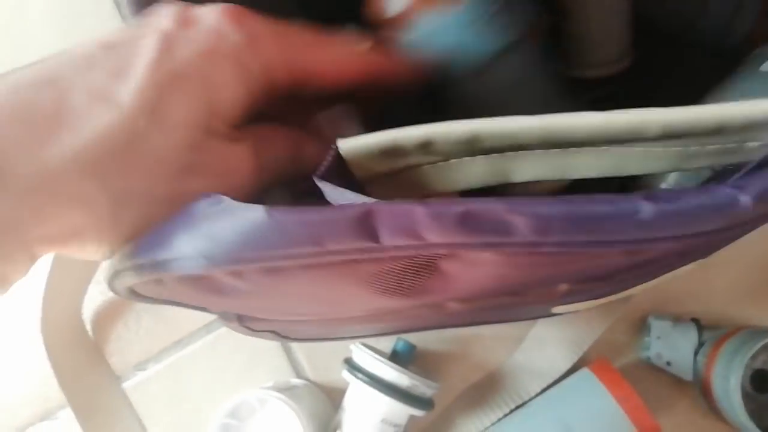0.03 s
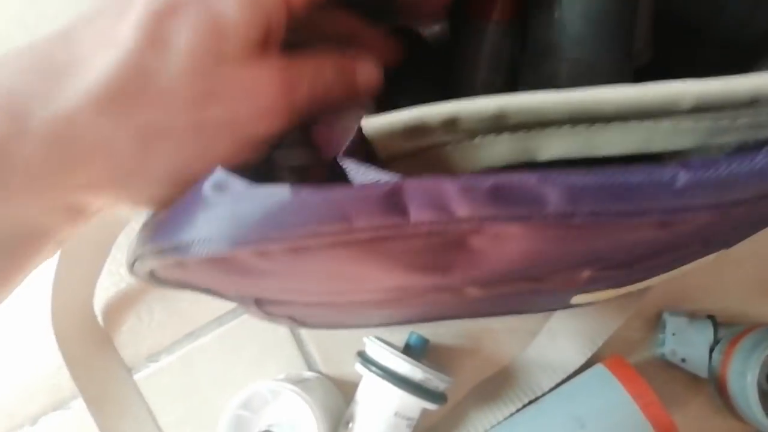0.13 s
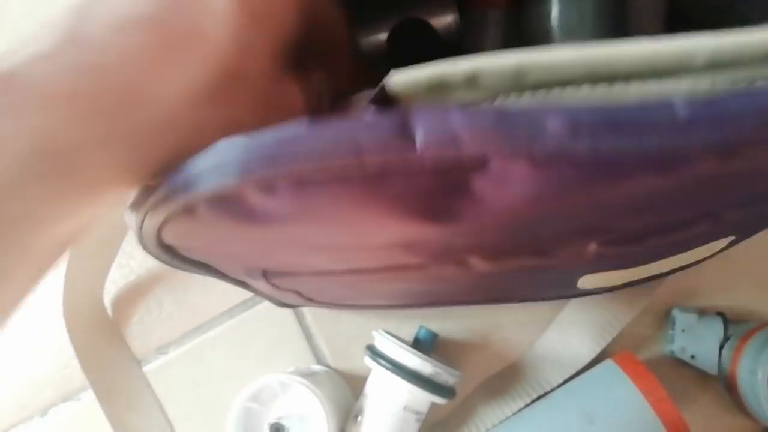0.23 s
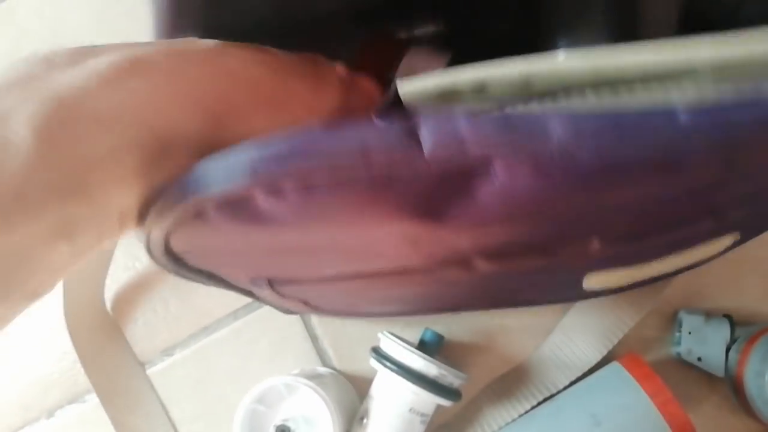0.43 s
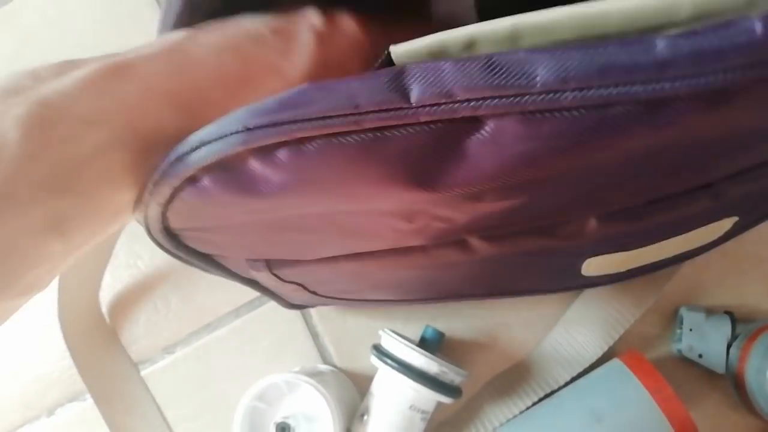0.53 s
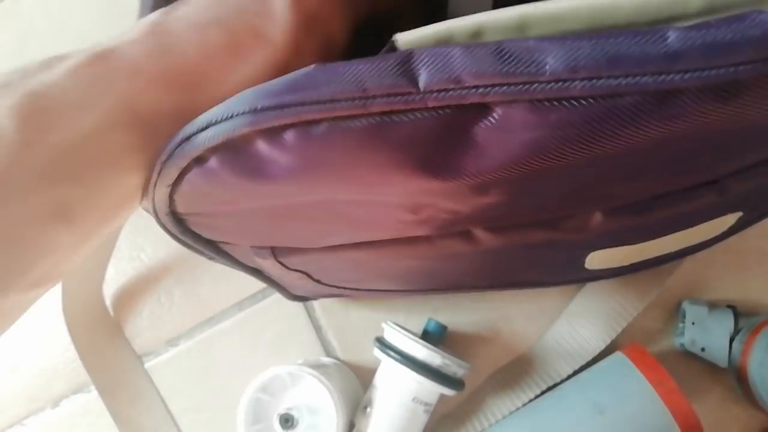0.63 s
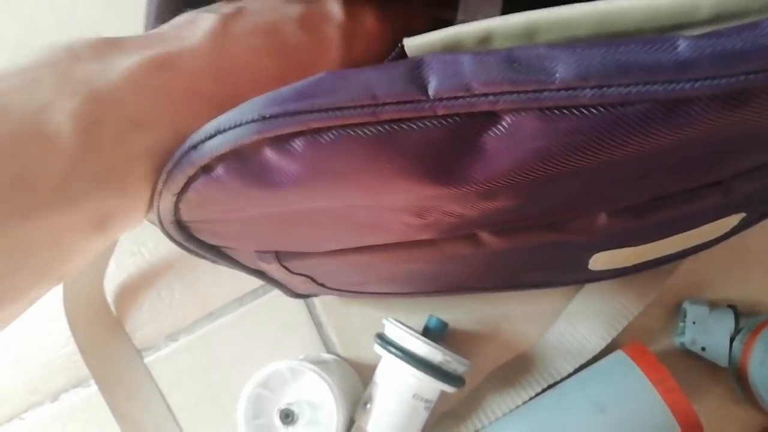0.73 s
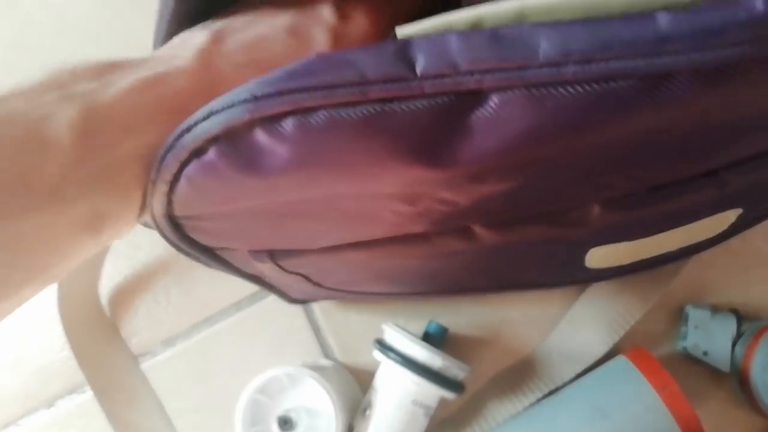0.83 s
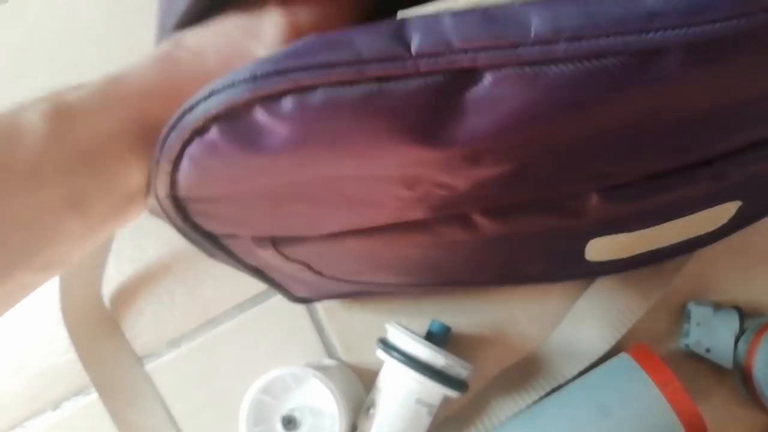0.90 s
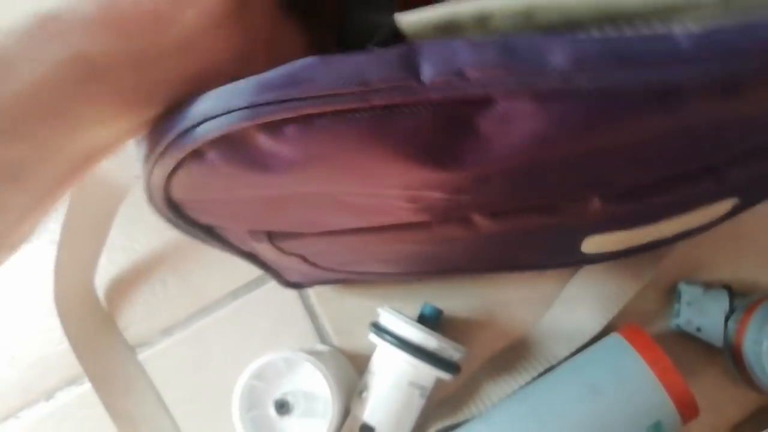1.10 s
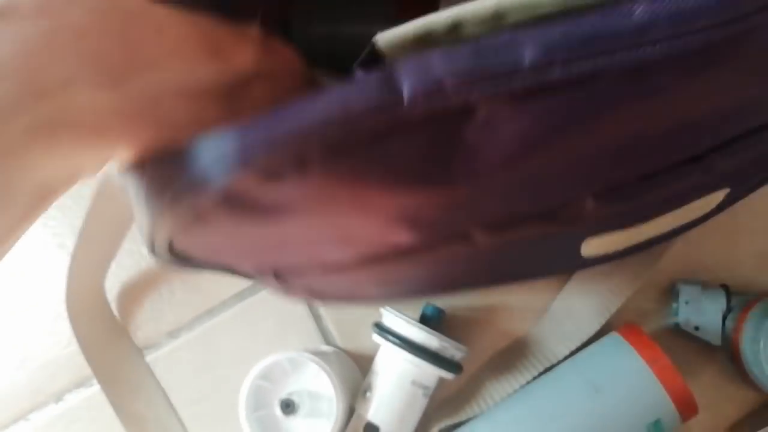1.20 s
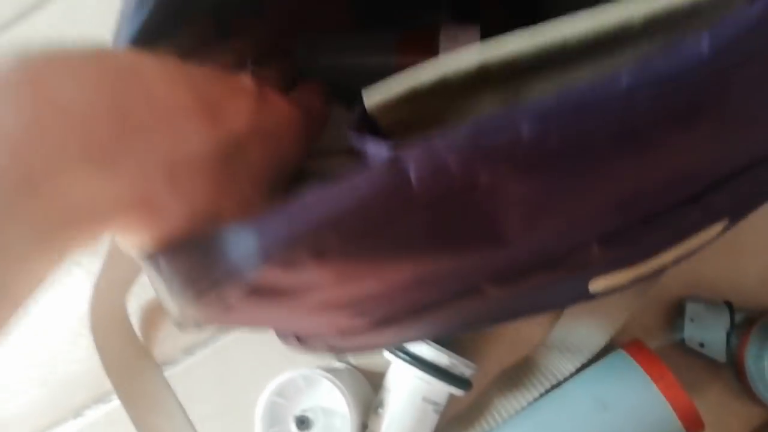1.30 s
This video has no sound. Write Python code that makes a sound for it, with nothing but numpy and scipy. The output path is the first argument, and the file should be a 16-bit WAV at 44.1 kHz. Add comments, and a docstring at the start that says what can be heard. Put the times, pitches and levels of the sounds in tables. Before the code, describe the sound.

Hard plastic and metal parts clatter in a fabric pouch as a hand rummages, with dull thumps and cloth rustle; dense sharp knocks first, then sparser clicks, very close stereo microphones in a small room.

```python
"""Sharp clacks and knocks over rustling cloth: a hand rummages in a pouch of hard plastic and metal parts.
Each knock is a chatter of random contacts, heard as a crack and as the push on hollow-body and part modes.
Cloth is coloured noise with grains and faint rattling parts; thumps are dull decaying tones with a puff.
A small room answers the knocks. Two close microphone ports hear it all, the right one later and dull."""
import sys
import numpy as np
from scipy import signal
from scipy.fft import rfft, irfft, next_fast_len
from scipy.io import wavfile
from scipy.ndimage import uniform_filter1d, map_coordinates

SR = 44100
rng = np.random.default_rng(int(sys.argv[2]) if len(sys.argv) > 2 else 0)


def generate_wav(signal):
    """Clip the signal to [-1, 1] and save it as 16-bit WAV at the path in sys.argv[1]."""
    frames = np.transpose(np.atleast_2d(signal))
    scaled = np.clip(frames, -1, 1) * 32767
    pcm = np.round(scaled).astype(np.int16)
    wavfile.write(sys.argv[1], SR, pcm)


N = 59535  # samples


def amp(db):
    """Decibels to an amplitude ratio: 20 dB is a factor of ten."""
    return 10 ** (np.asarray(db) / 20)


def unit(x):
    """Normalization by the root mean square."""
    return x / np.sqrt(np.mean(x ** 2) + 1e-20)


def loudest(x):
    """Short-time energy: the loudest 256 samples (6 ms) are scaled to rms 1."""
    power = uniform_filter1d(np.mean(x ** 2, 0), size=256)
    return x / np.sqrt(power.max() + 1e-20)


def along(points, hz):
    """Interpolation of (frequency, value) points on a logarithmic frequency axis."""
    f, value = np.transpose(points)
    return np.interp(np.log(hz + 1), np.log(f + 1), value)


def filtered(x, response):
    """Linear filtering: the spectrum is multiplied by a complex response of frequency."""
    size = next_fast_len(x.shape[-1] + 4096)
    spectrum = rfft(x, size) * response(np.fft.rfftfreq(size, 1 / SR))
    return irfft(spectrum, size)[..., :x.shape[-1]]


def wobble(rate):
    """Slow random modulation: a smooth curve through random knots, rate knots a second."""
    return map_coordinates(rng.standard_normal(200), [np.arange(N) * rate / SR])


def clicks(per_s, scatter_db, size):
    """Random impulse process: sparse contacts of either sign and uneven strength."""
    chance, sign = rng.random((2, size))
    strength = amp(scatter_db * rng.standard_normal(size))
    return (chance < per_s / SR) * strength * np.sign(sign - 0.5)


# Likeness of the left and right sound, falling with frequency: frequency_hz, likeness (0 to 1)
LIKENESS = [(150, .996), (300, .92), (500, .9), (1000, .8), (2500, .4), (10000, .25)]


def pair(a, b, colour):
    """Interaural-style coherence: two signals mix as mid and side to the given likeness, then colour."""
    def mid_side(hz):
        angle = np.arccos(np.clip(along(LIKENESS, hz), -1, 1)) / 2
        return amp(along(colour, hz)) * [np.cos(angle), np.sin(angle)]

    mid, side = filtered(np.array([a, b]), mid_side)
    return np.array([mid + side, mid - side])


MODE_SCATTER_DB = 2


def ringing(hz, db, t60, push):
    """Modal synthesis: a push excites damped sines, each with its own level and its phase at each port."""
    t = np.arange(SR // 16) / SR
    level, phase = rng.standard_normal((2, len(hz), 1)), 2 * np.pi * rng.random((2, len(hz), 1))
    alike = along(LIKENESS, hz)[:, None]
    port_phase = phase[0] + (1 - alike) * (phase - np.pi)
    free = amp(-60 * t / t60[:, None]) * np.sin(2 * np.pi * hz[:, None] * t + port_phase)
    driven = signal.fftconvolve(free, push[None, None], axes=2)[..., :len(push)]
    # each driven mode gets the energy of its free decay, however the push favours it
    free_norm = np.linalg.norm(free, axis=2, keepdims=True)
    driven_norm = np.linalg.norm(driven, axis=2, keepdims=True) + 1e-20
    return (amp(db[:, None] + MODE_SCATTER_DB * level) * free_norm / driven_norm * driven).sum(1)


# Reverberation time of the small room: frequency_hz, t60_s
ROOM_DECAY = [(3000, 0.24), (12000, 0.04)]


def room(x):
    """Reverberation: convolution with a noise tail in which each frequency dies at its own speed."""
    hz, t, noise = signal.stft(rng.standard_normal((2, SR // 3)), SR, nperseg=256)
    decay = amp(-60 * t / along(ROOM_DECAY, hz)[:, None])
    tail = signal.istft(noise * decay, SR, nperseg=256)[1]
    delayed = np.pad(x, ((0, 0), (200, 0)))  # samples
    return signal.fftconvolve(delayed, tail / np.linalg.norm(tail[0]), axes=1)[:, :N]


# Modes of the hard parts: frequency_hz, level_db, t60_s
PART_MODES = [(2490, -5.5, 0.045), (2746, 3, 0.022), (2910, -0.5, 0.064), (3077, 2.5, 0.018),
              (3158, 4, 0.035), (3417, 4.5, 0.032), (3580, 0.5, 0.036), (3904, 2, 0.05), (4024, 3, 0.024),
              (4700, -19, 0.017), (5700, -2, 0.04), (6370, -8, .03)]
# Modes of the hollow bodies: frequency_hz, level_db
HOLLOW_MODES = [(865, -1), (990, -2), (1170, 1.5), (1310, -0.5), (1630, 7.5), (1900, -10), (2330, 5)]
HOLLOW_T60_S = 0.014  # in a knock
CONTACT_SCATTER_DB = 5
TOUCHES_PER_S = 110 / 12  # on each mode


def rattle():
    """Random excitation of resonators: faint touches, each ringing one part mode or hollow mode."""
    hollow = [(hz, db, 2 * HOLLOW_T60_S) for hz, db in HOLLOW_MODES]  # rings on longer than in a knock
    out = np.zeros((2, N))
    for hz, db, t60 in list(PART_MODES) + hollow:
        touches = clicks(TOUCHES_PER_S, CONTACT_SCATTER_DB, size=N)
        out += ringing(np.array([hz]), np.array([db]), np.array([t60]), touches)
    return unit(out)


# Course of the stirring: time_s, cloth_level_db, treble_level_db, rumble_level_db
STIRRING = [(0, -54.5, -52, -54), (0.086, -41, -39.5, -42), (.15, -46, -40.5, -40.5),
            (0.232, -35.5, -33, -38), (0.379, -38, -44, -40.5), (.44, -29.5, -37, -39.5),
            (.5, -26.5, -22.5, -38.5), (.56, -31.5, -44.5, -30), (.63, -30, -35, -36.5),
            (.7, -41, -43, -36.5), (.75, -35.5, -48, -42.5), (.82, -39, -43, -42.5), (.88, -36, -51, -44),
            (0.958, -45, -42, -44.5), (1.021, -35, -41, -44.5), (1.11, -43, -45.5, -43.5),
            (1.17, -42, -35.5, -41.5), (1.35, -44.5, -44, -45.5)]
# Colour of the rubbing cloth: frequency_hz, spectrum_level_db
CLOTH_COLOUR = [(260, -67), (450, -10.5), (755, -6), (894, 0), (1140, 1.5), (1590, 0), (2260, -9.5),
                (3170, -5), (5990, -13), (8000, -44), (17600, -120)]
# Colour of skin sliding on cloth: frequency_hz, spectrum_level_db
SLIDE_COLOUR = [(2000, -23), (4000, 0.5), (7500, -13.5), (11000, -3.5), (15000, -3)]
# Colour of the low rumble: frequency_hz, spectrum_level_db
RUMBLE_COLOUR = [(15, -4), (145, -0.5), (222, -5), (282, -0.5), (420, -5), (600, -15.5), (1320, -120)]
GRAINS_PER_S, GRAIN_SCATTER_DB, GRAIN_SHARE = 700, 0.5, 0.38  # share of the rubbing power
FLUTTER_DB, RUMBLE_FLUTTER_DB = 2.5, 2.1
RATTLE_DB = -5  # over the cloth level


def rubbing():
    """Friction noise: a steady hiss and small grains share the power."""
    grains = unit(clicks(GRAINS_PER_S, GRAIN_SCATTER_DB, size=N))
    return np.sqrt(1 - GRAIN_SHARE) * rng.standard_normal(N) + np.sqrt(GRAIN_SHARE) * grains


def rustle():
    """Amplitude-modulated friction noise: cloth, sliding skin and rumble, with the rattle following the cloth."""
    time_s, *levels = np.transpose(STIRRING)
    cloth_db, treble_db, rumble_db = [np.interp(np.arange(N) / SR, time_s, level) for level in levels]
    a, b, flutter = rubbing(), rubbing(), wobble(70.25)
    cloth = amp(cloth_db + FLUTTER_DB * flutter) * unit(pair(a, b, CLOTH_COLOUR))
    slide = amp(treble_db + FLUTTER_DB / 2 * flutter) * unit(pair(a, b, SLIDE_COLOUR))
    low_noise = unit(pair(*rng.standard_normal((2, N)), RUMBLE_COLOUR))
    rumble = amp(rumble_db + RUMBLE_FLUTTER_DB * wobble(25.42)) * low_noise
    return cloth + amp(cloth_db + RATTLE_DB) * rattle() + slide + rumble


# Thumps of the pouch: start_s, level_db (before the rise and a doubling), pitch_hz
POUCH_THUMPS = [(0.043, -29, 190), (0.109, -22.5, 141), (0.185, -15, 166), (0.263, -20, 200),
                (0.279, -23, 178), (0.453, -16.5, 336), (0.48, -16.5, 296), (0.574, -22, 152),
                (1.16, -23, 258), (1.17, -22.5, 244)]
THUMP_CYCLES = 5.5  # cycles to die by 60 dB
THUMP_RISE_S, PUFF_SHARE = 0.003, 0.3


def thumps():
    """Damped oscillation: the pouch and its load push air at both ports alike, with a puff of noise."""
    out, t = np.zeros(N + SR), np.arange(SR // 5) / SR
    for start_s, level_db, hz in POUCH_THUMPS:
        band = lambda f: f / (hz + f) / (1 + (f / (2 * hz)) ** 4)
        puff = unit(filtered(rng.standard_normal(len(t)), band))
        decay = amp(level_db - 60 * t * hz / THUMP_CYCLES)
        rise = 1 - np.exp(-t / THUMP_RISE_S)
        thump = 2 * decay * rise * (np.sin(2 * np.pi * hz * t) + PUFF_SHARE * puff)
        out[round(start_s * SR):][:len(t)] += thump
    return out[:N]


# Colour of the crack: frequency_hz, level_db
CRACK_COLOUR = [(600, -40), (900, -8.5), (2100, -7.5), (4000, 1), (6300, -6.5), (7500, -21.5), (9000, -24)]
# Colour of the treble part of the crack: frequency_hz, level_db
TREBLE_COLOUR = [(4000, -16), (7500, -18), (10000, -2.5), (13000, -1), (15000, 2)]
# Knocks: start_s, crack_peak_db, hollow_level_db, ring_level_db, treble_over_crack_db (before the lift),
# hollow_centre_hz, ring_centre_hz, chatter_decay_s
PART_KNOCKS = [(0.0413, -11.5, -30.5, -24, -13, 940, 3340, 0.0018),
               (0.0922, -25, -34, -35, -10, 1140, 3150, 0.0025),
               (0.102, -7.5, -25, -18.5, -14.5, 980, 3170, 0.0058),
               (0.128, -22, -22.5, -29, -11, 980, 3140, 0.0031),
               (0.182, 1.5, -22.5, -12.5, -12, 1030, 3510, 0.0032),
               (0.2014, -9, -31, -27, -27, 1070, 3400, 0.0019),
               (0.2178, -24, -28, -26.5, -9, 1880, 4080, 0.0031),
               (0.2458, -9.5, -22.5, -51, -18, 950, 2340, 0.003),
               (0.2638, -10, -23.5, -17.5, -18, 1470, 3360, 0.0043),
               (0.2934, -17.5, -18, -22, -5.5, 900, 3300, 0.0027),
               (0.4006, -15.5, -20.5, -25, -15, 1450, 4330, 0.0024),
               (0.4373, -40, -24, -28, -15, 1680, 2520, 0.0023),
               (0.4476, -30, -24.5, -23, -1, 990, 2860, 0.0026),
               (0.4546, -19.5, -25, -14, -3, 920, 3340, 0.0029),
               (0.4626, -5, -46, -12.5, -11, 970, 3010, 0.0035),
               (0.4675, -36, -25, -11, -14, 1100, 2670, 0.001),
               (0.4756, -10.5, -17, -25, -10, 1200, 3640, 0.0024),
               (0.493, -18.5, -41, -21.5, -5.5, 1000, 4280, 0.011),
               (0.5104, -15, -23.5, -16.5, -7.5, 1374, 3590, 0.0047),
               (0.5861, -15.5, -26.5, -21, -5, 1030, 2960, 0.004),
               (0.6014, -21, -37, -23.5, -6, 1460, 3300, 0.0045),
               (0.6131, -17, -25.5, -20.5, -18, 940, 3440, 0.0039),
               (0.6207, -25, -29, -13.5, -1, 1200, 2980, 0.0023),
               (0.6551, -40, -26, -17, -8, 1140, 3330, 0.0022),
               (0.667, -33, -18, -44, -14, 1136, 2220, 0.0028),
               (0.6779, -11, -24.5, -16, -18, 1380, 2970, 0.0038),
               (0.7578, -5, -21.5, -10.5, -5, 1090, 2640, 0.0026),
               (0.7835, -4.5, -31, -40, -29, 1110, 3000, 0.003),
               (0.7885, -5.5, -20, -14, -11.5, 980, 2900, 0.0035),
               (0.886, -48, -39, -27.5, -17, 830, 2760, 0.0053),
               (0.9069, -25, -55, -22, -4.5, 1300, 4050, 0.0038),
               (0.9394, -24.5, -21, -21.5, -7, 1090, 3330, 0.0045),
               (0.9547, -19, -26, -51, -18, 1700, 3230, 0.0049),
               (0.9647, -18.5, -29, -27, -26, 1000, 3080, 0.0043),
               (1.0336, -26.5, -24.5, -19.5, -11, 2110, 3930, 0.0042),
               (1.0587, -9.5, -21.5, -23.5, -10, 970, 3650, 0.0025),
               (1.0916, -27.5, -29.5, -28, -5.5, 930, 3200, 0.0034),
               (1.1056, -35, -33.5, -40, -10, 1140, 3230, 0.0025),
               (1.182, -32, -28, -42.5, -32, 1110, 3330, 0.0013)]
CONTACTS_PER_S = 7000
RISE_SHARE = 0.74  # rise time over chatter decay time
HOLLOW_REACH, RING_REACH = 0.38, 0.2  # octaves from the centre where modes are 6 dB down
CREST_DB = 12  # peak of a crack over its rms
TREBLE_LIFT_DB = 14.5  # treble arrives louder before the shaded port dulls it
KNOCK_LOW_HZ = 642  # knocks, hollow body included, carry nothing below this


def nearness(hz, centre, reach):
    """Selective excitation: a mode's level in dB falls with its squared distance in octaves."""
    return -6 * (np.log2(hz / centre) / reach) ** 2


def knocks():
    """Impact excitation: a chatter of contacts cracks and rings the modes near two centres."""
    out, t = np.zeros((2, N + SR)), np.arange(SR // 8) / SR
    part_hz, part_db, part_t60 = np.transpose(PART_MODES)
    low_hz, low_db = np.transpose(HOLLOW_MODES)
    low_t60 = np.full(len(low_hz), HOLLOW_T60_S)
    for start_s, crack_db, hollow_db, ring_db, treble_db, hollow_hz, ring_hz, chatter_s in PART_KNOCKS:
        shape = (1 - np.exp(-t / (RISE_SHARE * chatter_s))) * np.exp(-t / chatter_s)
        contacts = clicks(CONTACTS_PER_S, CONTACT_SCATTER_DB, size=2 * len(t))
        push, other = contacts.reshape(2, -1) * shape
        body = ringing(low_hz, low_db + nearness(low_hz, hollow_hz, HOLLOW_REACH), low_t60, push)
        ring = ringing(part_hz, part_db + nearness(part_hz, ring_hz, RING_REACH), part_t60, push)
        crack = loudest(pair(push, other, CRACK_COLOUR))
        treble = loudest(pair(push, other, TREBLE_COLOUR))
        crack_rms_db = crack_db - CREST_DB
        sound = amp(hollow_db) * loudest(body) + amp(ring_db) * loudest(ring)
        sound += amp(crack_rms_db) * crack
        sound += amp(crack_rms_db + treble_db + TREBLE_LIFT_DB) * treble
        out[:, round(start_s * SR):][:, :len(t)] += sound
    return filtered(out[:, :N], lambda f: 1 / (1 + (KNOCK_LOW_HZ / (f + 1)) ** 8))


ROOM_DB = -13.5


def scene():
    """Superposition: cloth, pouch, and the knocks with their room."""
    parts = knocks()
    return rustle() + thumps() + amp(ROOM_DB) * room(parts) + parts


# Balance of the two microphone ports: frequency_hz, left_over_right_db
PORT_BALANCE = [(300, 0.5), (800, 0), (1500, -2.5), (2400, 5.5), (3500, -8), (5000, -3.5), (7200, 3.5),
                (10400, 14), (15000, 21.5)]
RIGHT_LAG_S, TOP_HZ = 0.00013, 15900


def ports(hz):
    """Acoustic shadow and path difference: the weaker port is cut at each frequency; the right one lags."""
    balance = along(PORT_BALANCE, hz)
    lag = np.exp(-2j * np.pi * hz * RIGHT_LAG_S)
    return np.array([amp(np.minimum(balance, 0)), lag * amp(-np.maximum(balance, 0))])


def record(dry):
    """Saturation and band limiting: the ports hear the scene, high peaks round off, the top is cut."""
    x = filtered(dry, ports)
    x = x / (1 + np.abs(x) ** 6) ** (1 / 6)
    return filtered(x, lambda hz: hz < TOP_HZ)


dry = scene()
out = record(dry)
generate_wav(out)
```